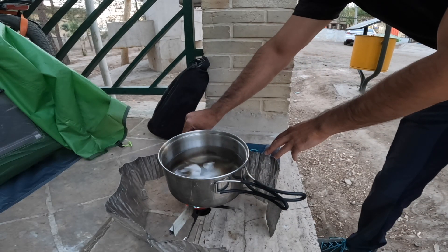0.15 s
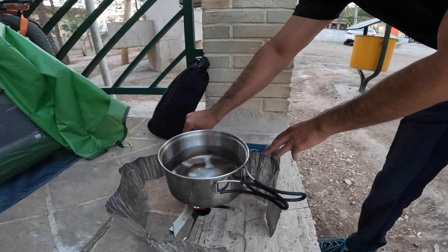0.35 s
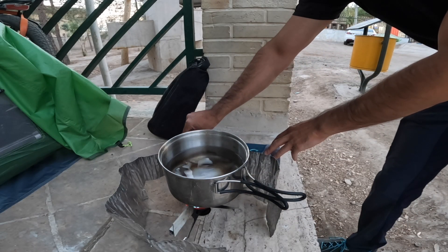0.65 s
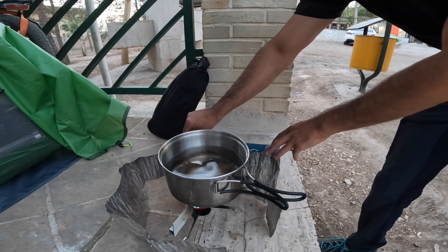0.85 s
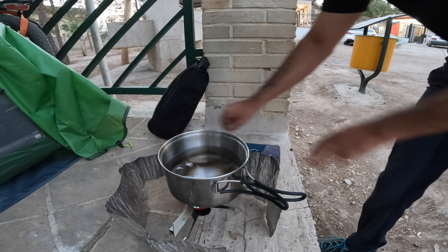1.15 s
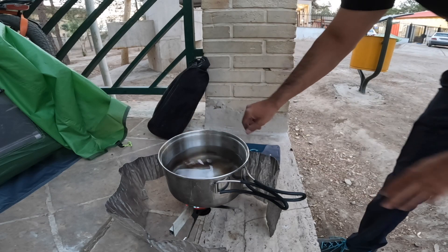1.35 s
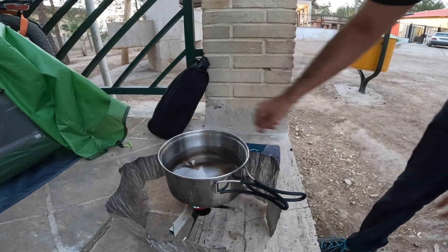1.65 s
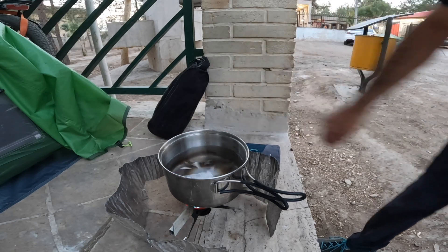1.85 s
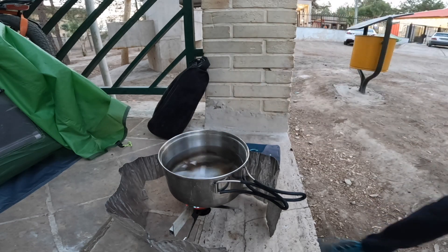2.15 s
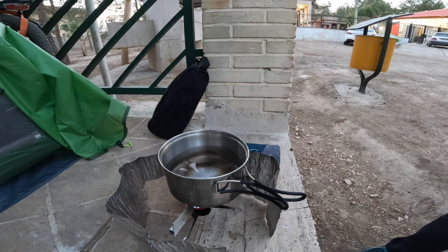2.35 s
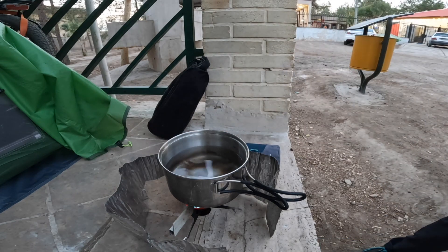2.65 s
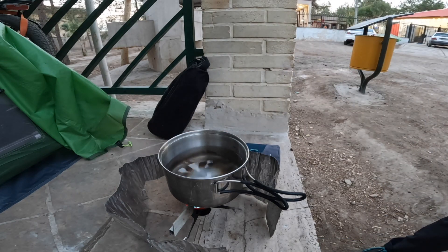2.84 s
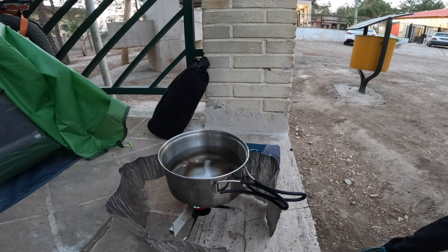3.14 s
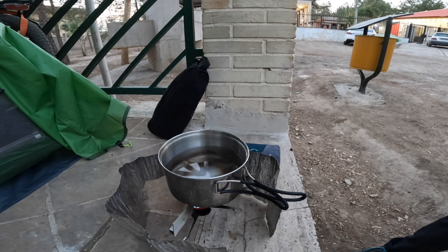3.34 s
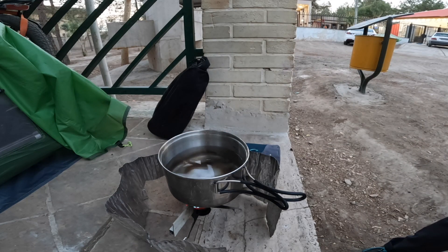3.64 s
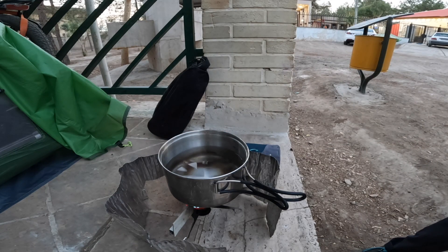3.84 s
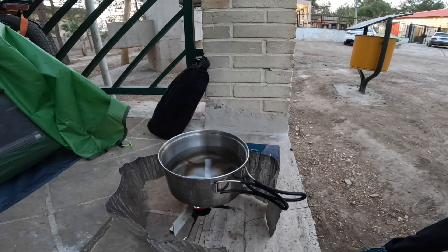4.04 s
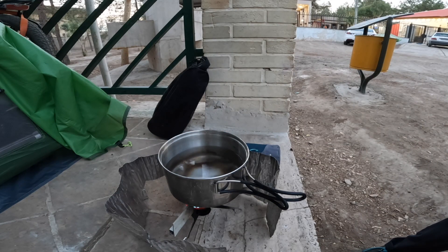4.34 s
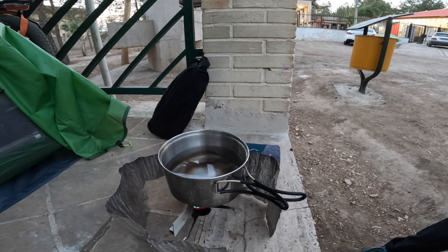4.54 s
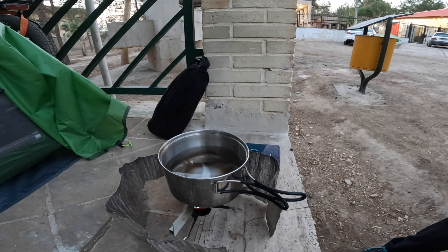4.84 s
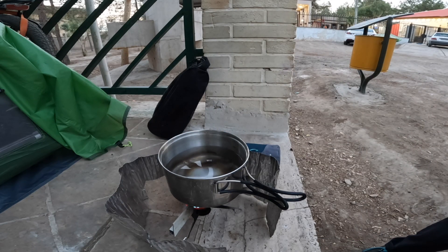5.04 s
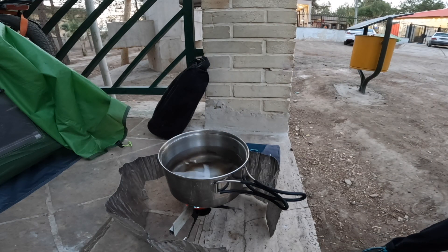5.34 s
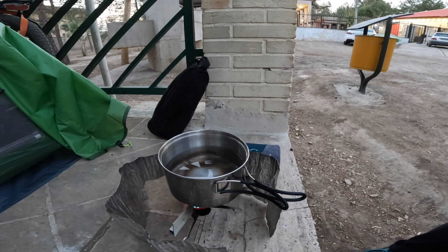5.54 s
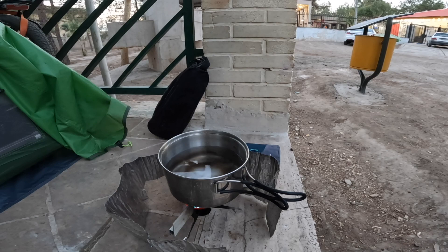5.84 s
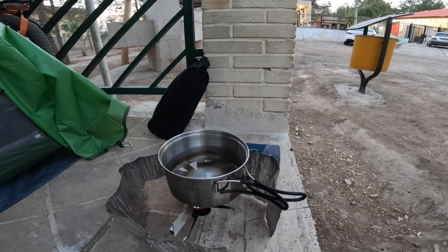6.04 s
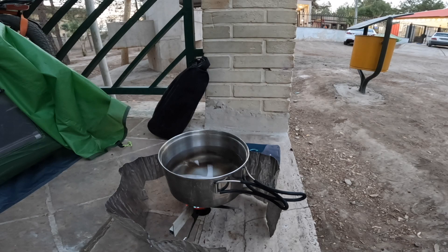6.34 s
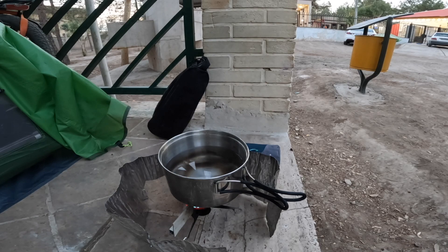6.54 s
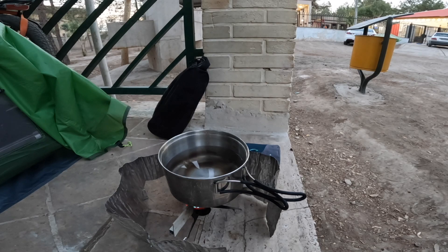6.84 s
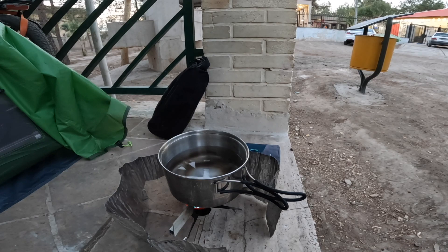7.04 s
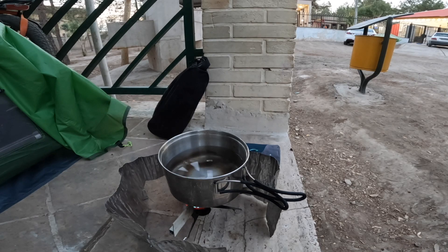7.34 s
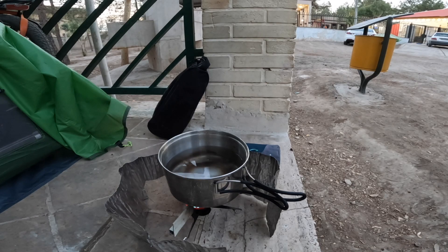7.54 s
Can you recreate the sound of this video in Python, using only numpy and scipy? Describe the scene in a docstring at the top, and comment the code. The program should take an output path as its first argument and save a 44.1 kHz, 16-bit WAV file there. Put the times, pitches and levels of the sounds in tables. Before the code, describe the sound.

A liquid-fuel stove burns at full strength under a steel pot on a stone porch, close to the microphone. A heavy, lumpy low rumble dominates, with a hollow roar and a piercing jet hiss above it. Low hums swell briefly early on; later two faint drones, like distant engines gathering speed, climb slowly. The roar never stops.

```python
"""Camping stove under a pot

A liquid-fuel stove burns hard under a steel pot on a stone porch, heard from close by.
The turbulent flame rumbles and roars: two shaped noises, their chance swells partly evened out.
The vapour jet hisses through burner and pot resonances: noise in three bands that swell separately.
Low hums (gliding sines) come and go; two drones like far engines gathering speed climb slowly in pitch."""
import sys
import numpy as np
from scipy import signal
from scipy.fft import rfft, irfft, next_fast_len
from scipy.io import wavfile
from scipy.ndimage import uniform_filter1d, minimum_filter1d

SR = 44100
rng = np.random.default_rng(int(sys.argv[2]) if len(sys.argv) > 2 else 0)


def transcribe(u):
    """Save the signal u as a 16-bit wav file named by the first command-line argument.

    u: samples, shape (n,) or (channels, n), limited to [-1, 1]; the rate is SR.
    q: integer samples, one column per channel.
    """
    v = np.clip(np.atleast_2d(u).T, -1, 1)
    q = np.round(v * 32767).astype(np.int16)
    wavfile.write(sys.argv[1], SR, q)


N = 339129
TIME_S = np.arange(N) / SR
FLICKER_HZ, FLICKER_RMS_DB = 11, 0.28  # shared by roar and jet


def gain_of(db):
    """Decibels to amplitude."""
    return 10 ** (np.asarray(db) / 20)


def evened(x):
    """Scales to an rms of 1."""
    return x / np.sqrt(np.mean(x ** 2) + 1e-20)


def over_hz(table, hz):
    """Reads each column of a table on a log-frequency axis."""
    table_hz, *columns = np.transpose(table)
    return [np.interp(np.log(hz + 1), np.log(table_hz + 1), column) for column in columns]


def over_time(table):
    """Reads each column of a curve at every sample."""
    table_s, *columns = np.transpose(table)
    return [np.interp(TIME_S, table_s, column) for column in columns]


def low_pass(hz, edge_hz, order):
    """Gain of a smooth low-pass, one half at the edge."""
    return 1 / (1 + (hz / edge_hz) ** order)


def wander(top_hz):
    """Slow chance of rms 1, with little motion faster than top_hz."""
    hz = np.fft.rfftfreq(N, 1 / SR)
    spectrum = rfft(rng.standard_normal(N))
    return evened(irfft(spectrum * low_pass(hz, top_hz, order=4), N))


# two microphone ports: pitch_hz, unshared_power_db, left_lead_rad, left_minus_right_db
PORT_PAIR = [(70, -32, 0.0, 0.1), (250, -16, -0.03, 0.3), (380, -13.5, -0.04, -0.2),
             (530, -15, -0.06, -0.7), (800, -6, -0.25, -0.0), (1200, -3.5, -0.41, 1.8),
             (1850, -4, -0.48, 0.3), (2300, -9, -0.49, -0.6), (2850, -3, -0.51, 0.1),
             (3400, -7, -0.44, -0.4), (4000, -16, -0.03, 0.1), (5100, -16, -0.01, 0.1),
             (5900, -12, -0.1, 0.3), (6500, -8, -0.08, -0.1), (6750, -12, -0.04, 0.8),
             (7200, -13, -0.01, 1.8), (8400, -15, -0.0, 1.8), (10300, -15, -0.0, 4.7),
             (12400, -5, -0.02, 5.1), (14000, -2, -0.04, 1.2)]


def turbulence(colour):
    """Noise with the amplitude spectrum colour(hz), partly shared by the two ports; rms 1."""
    size = next_fast_len(N)
    hz = np.fft.rfftfreq(size, 1 / SR)
    unshared_db, lead_rad, balance_db = over_hz(PORT_PAIR, hz)
    unshared = np.minimum(gain_of(unshared_db), 1)
    left, other = rfft(rng.standard_normal((2, size)))
    mixed = np.sqrt(1 - unshared ** 2) * left + unshared * other
    right = mixed * np.exp(-1j * lead_rad)
    ports = np.array([left * gain_of(balance_db / 2), right * gain_of(-balance_db / 2)])
    return evened(irfft(ports * colour(hz), size)[:, :N])


def steadied(x, span_s, share):
    """Takes a share of the chance swells longer than span_s out of a noise; rms 1."""
    size = int(span_s * SR)
    power = uniform_filter1d(uniform_filter1d((x ** 2).mean(0), size), size)
    return evened(x / (abs(power) + 1e-9) ** (share / 2))


def shimmer(x, depth_rms_db, from_hz):
    """Narrow bands, mostly above from_hz, slowly fade in and out; rms 1."""
    frame, hop = 2048, 512  # samples
    hz, _, z = signal.stft(x, SR, nperseg=frame, noverlap=frame - hop)
    patches = rng.standard_normal(z.shape[1:])
    for _ in range(2):
        patches = uniform_filter1d(patches, size=4, axis=0)  # bins
        patches = uniform_filter1d(patches, size=45, axis=1)  # frames
    reach = hz ** 2 / (hz ** 2 + from_hz ** 2)
    z = z * gain_of(depth_rms_db * reach[:, None] * evened(patches))
    _, shimmering = signal.istft(z, SR, nperseg=frame, noverlap=frame - hop)
    return evened(shimmering[:, :N])


# low hums, rms level at the height of the swell: start_s, length_s, start_hz, end_hz, level_db
LOW_HUMS = [(0.1, 0.74, 66.84, 65, -12.5), (1.052, 0.52, 70.5, 51, -16), (1.478, 0.4, 50, 43.9, -10.5),
            (1.44, 0.71, 113, 126.5, -18.5), (2.295, 1.24, 105, 107.3, -16.5),
            (2.85, 0.85, 39.2, 36.8, -16), (3.45, 1.21, 107, 110.6, -21)]


def hums():
    """Each low hum is a sine that swells, glides a little and dies away."""
    out = np.zeros(N)
    for start_s, length_s, start_hz, end_hz, level_db in LOW_HUMS:
        progress = np.clip((TIME_S - start_s) / length_s, 0, 1)
        pitch_hz = start_hz + (end_hz - start_hz) * progress
        turns = np.cumsum(pitch_hz) / SR + rng.random()
        swell = np.sin(np.pi * progress)
        out += np.sqrt(2) * gain_of(level_db) * swell * np.sin(2 * np.pi * turns)
    return out


# lower drone, rms level: time_s, pitch_hz, level_db
LOWER_DRONE = [(2.25, 72, -28), (2.65, 73.4, -17.5), (3.1, 74.1, -31), (3.6, 75.1, -21), (4.08, 77, -11),
               (4.24, 78.4, -23), (4.42, 79.55, -8), (4.7, 81.6, -20), (5.05, 82.9, -12), (5.4, 83.95, -26),
               (6.0, 87.35, -20.5), (7.69, 92, -23)]
# higher drone, rms level: time_s, pitch_hz, level_db
HIGHER_DRONE = [(2.6, 156, -36), (2.95, 157, -24), (3.6, 159.5, -23.5), (4.4, 161.1, -32.5),
                (4.75, 165, -21), (5.2, 166.6, -21), (5.37, 168, -27), (5.52, 169.5, -22.5),
                (6.15, 172, -17), (6.55, 175, -18.5), (7.1, 178.5, -25.5), (7.69, 182, -33.5)]
DRONE_FADE_S, DRONE_WAVER_RMS_SHARE, DRONE_THROB_RMS_DB = 0.15, 0.006, 1.16


def drone(curve):
    """A far, nearly pure tone that throbs and wavers as it climbs."""
    pitch_hz, level_db = over_time(curve)
    fade_in = np.clip((TIME_S - curve[0][0]) / DRONE_FADE_S, 0, 1)
    wavering_hz = pitch_hz * (1 + DRONE_WAVER_RMS_SHARE * wander(top_hz=8.0))
    turns = np.cumsum(wavering_hz) / SR
    throb_db = DRONE_THROB_RMS_DB * wander(top_hz=4.8)
    return np.sqrt(2) * fade_in * gain_of(level_db + throb_db) * np.sin(2 * np.pi * turns)


# echoes from paving, pillar and wall: delay_ms, level_db
STONE_ECHOES = [(4.22, -26.5), (5.2, -20.5), (11.8, -19), (19, -25)]


def porch(hz):
    """Near stone surfaces comb the spectrum with a fine ripple."""
    echoes = sum(gain_of(level_db) * np.exp(-2j * np.pi * hz * delay_ms / 1000)
                 for delay_ms, level_db in STONE_ECHOES)
    return abs(1 + echoes)


# broad hiss between the resonances, relative density: pitch_hz, level_db_per_hz
JET_HISS = [(300, -32), (650, -6), (1500, -9), (2900, -22.5), (4700, -32), (7000, -25.5), (9000, -21),
            (12000, -29), (13600, -31), (14600, -53), (15300, -65)]
# resonances of the burner and of the gap under the pot, same scale: centre_hz, width_hz, level_db
RESONANCES = [(1054, 290, -9.5), (2036, 270, -11.5), (2274, 175, -6), (2680, 510, -15.5), (3307, 426, -11),
              (3590, 110, -15.5), (4198, 510, -7.5), (4360, 150, -17), (4960, 300, -13.5),
              (5110, 260, -14.5), (5675, 397, -1.86), (5885, 185, 0.0), (6214, 370, -3.5), (6500, 200, -15),
              (6750, 300, -11), (7190, 280, -11.5), (7680, 380, -14), (8550, 200, -21), (9210, 300, -17),
              (9880, 440, -18), (10430, 880, -19.5), (11100, 330, -20), (11680, 480, -19.5),
              (12300, 480, -23.5), (12900, 240, -26.5)]


def burner_colour(hz):
    """The jet's broad hiss plus the resonances that it excites, added in power."""
    power = gain_of(over_hz(JET_HISS, hz)[0]) ** 2
    for centre_hz, width_hz, level_db in RESONANCES:
        resonance = gain_of(level_db) / (1 + (2 * (hz - centre_hz) / width_hz) ** 2)
        power = power + resonance ** 2
    return np.sqrt(power)


# slow level of the jet's three bands: time_s, rush_db, ring_db, sizzle_db
JET_BANDS = [(0.0, 1.2, 1.7, 0), (0.6, -0.1, 1, -0.8), (1.3, 0.04, 0.5, 0.4), (2.1, -0.071, -1.0, 0),
             (2.9, 0.21, -1.6, 0), (3.3, -0.46, -1, 1.2), (3.6, -0.0, 1.5, 0), (4.05, 0.15, 1.5, -0.5),
             (4.55, -0.39, -0.9, 0.4), (5.15, -1.1, 0.3, -1.3), (5.75, 0, -0.5, -0.7),
             (6.4, 0.63, 0.7, -0.0), (7.15, -0.2, -1.5, 0.9), (7.69, 0.5, 1, 0.3)]
JET_DB = -23.5
SPUTTER_HZ = 21
SPUTTER_RUSH_RMS_DB, SPUTTER_RING_RMS_DB, SPUTTER_SIZZLE_RMS_DB = 0.19, 0.55, 0.62


def jet(flicker):
    """Fuel vapour hisses through the burner: a low rush, the burner's ringing band, a fine sizzle."""
    rush_db, ring_db, sizzle_db = over_time(JET_BANDS)
    noise = turbulence(lambda hz: burner_colour(hz) * porch(hz))
    hiss = shimmer(noise, depth_rms_db=3.5, from_hz=6900)
    spectrum, hz = rfft(hiss), np.fft.rfftfreq(N, 1 / SR)
    rush = irfft(spectrum * low_pass(hz, 4700, order=16), N)
    sizzle = irfft(spectrum * (1 - low_pass(hz, 6300, order=16)), N)
    ring = hiss - rush - sizzle
    ring = np.std(ring) * steadied(ring, span_s=0.17, share=0.64)
    sputter = wander(top_hz=SPUTTER_HZ)  # the vapour feeds unevenly
    bands = (rush * gain_of(rush_db + SPUTTER_RUSH_RMS_DB * sputter)
             + ring * gain_of(ring_db + SPUTTER_RING_RMS_DB * sputter)
             + sizzle * gain_of(sizzle_db + SPUTTER_SIZZLE_RMS_DB * sputter))
    return bands * gain_of(JET_DB + FLICKER_RMS_DB * flicker)


# combustion rumble, relative density: pitch_hz, level_db_per_hz
RUMBLE_COLOUR = [(7, -32), (11, -20), (16, -3), (22, -11), (38, -1.5), (50, -2.5), (72, 0), (100, -4),
                 (135, -7.5), (165, -12), (200, -17), (300, -29.5), (600, -65)]
# hollow roar under the pot, relative density: pitch_hz, level_db_per_hz
ROAR_COLOUR = [(100, -8.5), (200, -0.5), (250, 1), (330, -1), (430, 0), (530, 1), (605, -4.5), (690, -19.5),
               (900, -21), (2000, -54)]
# slow level of the rumble: time_s, level_db
RUMBLE_CURVE = [(0, -1), (1.3, 1), (1.8, 0), (2.2, -2.5), (2.5, -.5), (3.2, -1), (4.25, -2), (4.8, -2),
                (6.0, -1.5), (7.69, -1)]
RUMBLE_DB, ROAR_DB = -11.5, -23.5


def flame(flicker):
    """Turbulent burning: a deep, lumpy rumble, and a hollow roar under the pot that follows the jet's rush."""
    rumble_db, = over_time(RUMBLE_CURVE)
    rush_db = over_time(JET_BANDS)[0]
    rumble = turbulence(lambda hz: gain_of(over_hz(RUMBLE_COLOUR, hz)[0]))
    rumble = steadied(rumble, span_s=0.18, share=0.82)
    roar = turbulence(lambda hz: gain_of(over_hz(ROAR_COLOUR, hz)[0]))
    roar = steadied(roar, span_s=0.2, share=0.68)
    roar_db = ROAR_DB + 0.76 * rush_db + FLICKER_RMS_DB * flicker
    return rumble * gain_of(RUMBLE_DB + rumble_db) + roar * gain_of(roar_db)


def scene():
    """Low hums and drones behind; the stove in front, its roar and jet flickering together."""
    flicker = wander(top_hz=FLICKER_HZ)
    background = hums() + drone(LOWER_DRONE) + drone(HIGHER_DRONE)
    return background + jet(flicker) + flame(flicker)


def record(dry):
    """A fast limiter holds the biggest surges at full scale; then a low-pass limits the band."""
    headroom = np.minimum(1, 1 / (abs(dry).max(0) + 1e-9))
    limiter_gain = uniform_filter1d(minimum_filter1d(headroom, size=300), size=300)
    band_limit = signal.firwin(255, 14900, window=("kaiser", 9), fs=SR)  # edge in Hz
    return signal.oaconvolve(dry * limiter_gain, band_limit[None], "same")


dry = scene()
out = record(dry)
transcribe(out)
```